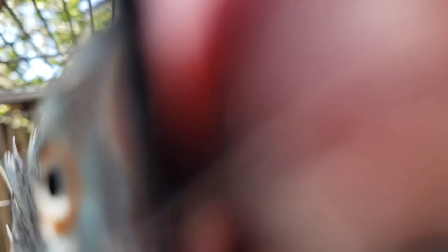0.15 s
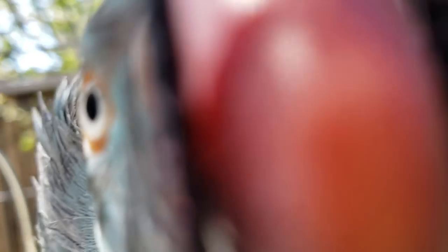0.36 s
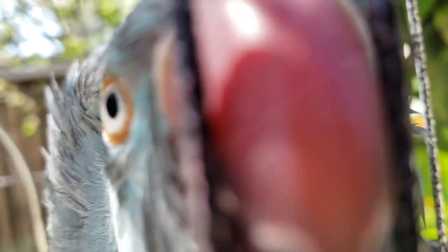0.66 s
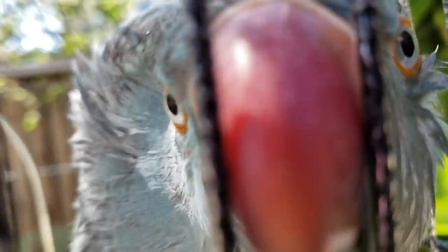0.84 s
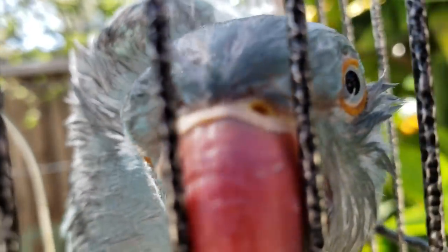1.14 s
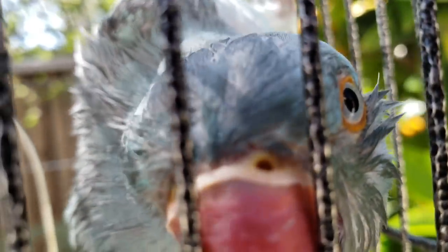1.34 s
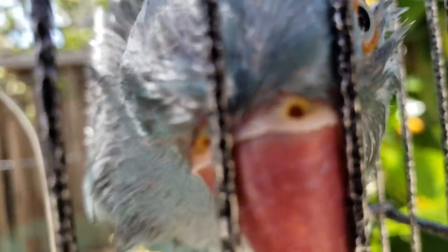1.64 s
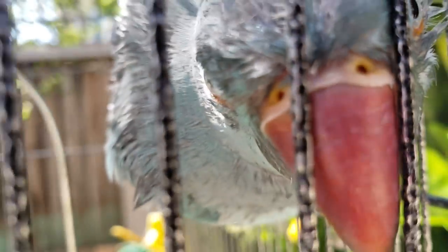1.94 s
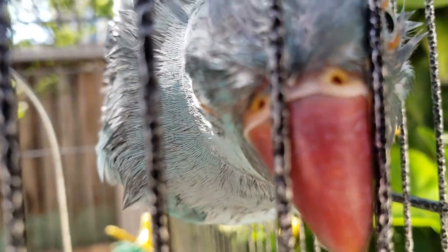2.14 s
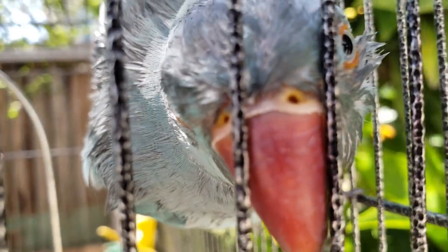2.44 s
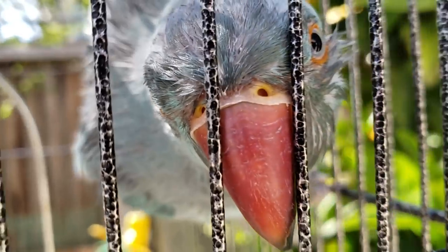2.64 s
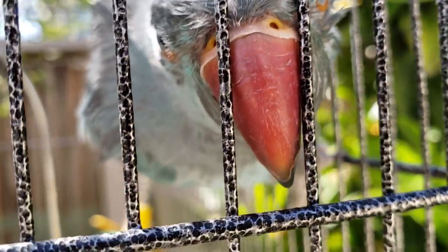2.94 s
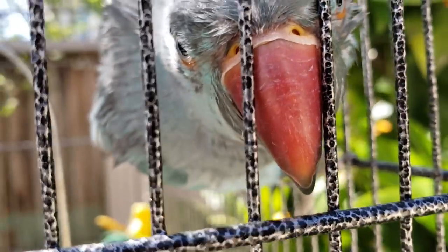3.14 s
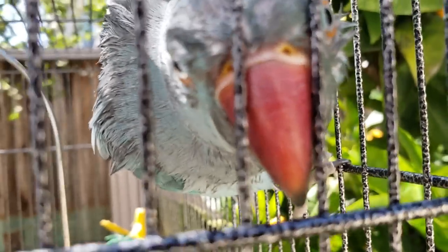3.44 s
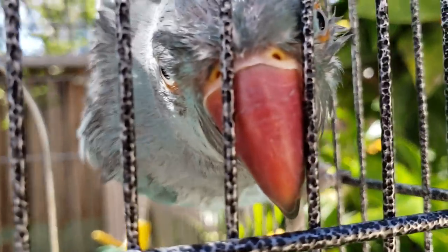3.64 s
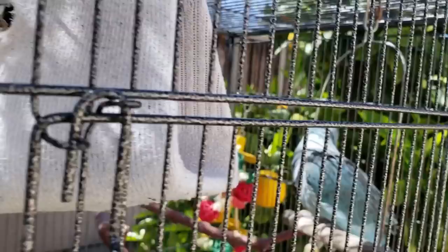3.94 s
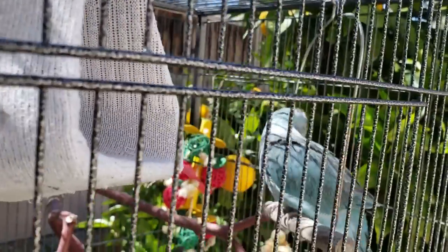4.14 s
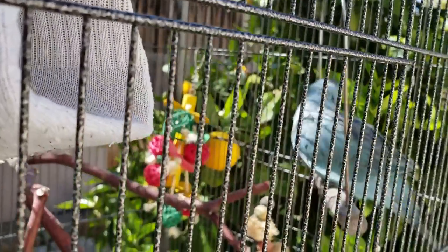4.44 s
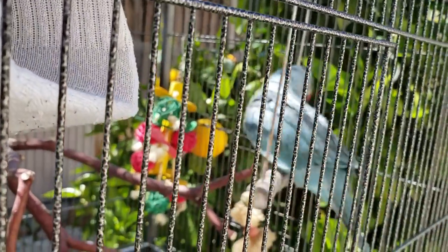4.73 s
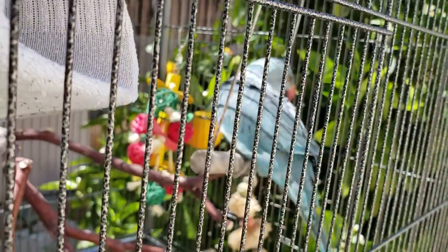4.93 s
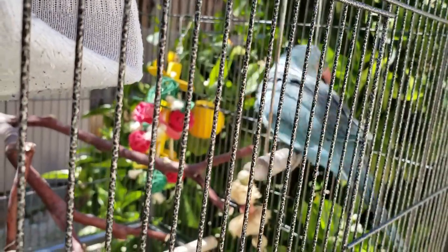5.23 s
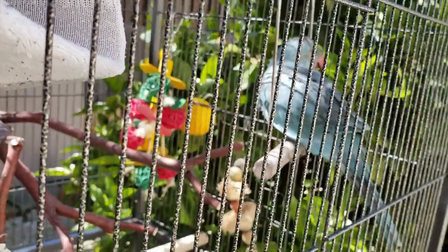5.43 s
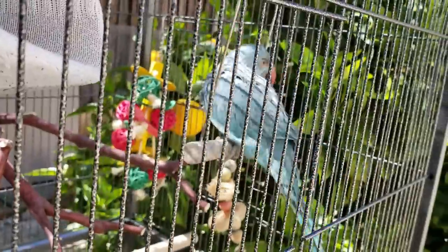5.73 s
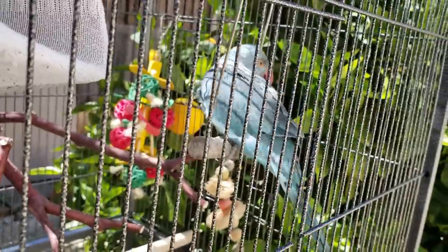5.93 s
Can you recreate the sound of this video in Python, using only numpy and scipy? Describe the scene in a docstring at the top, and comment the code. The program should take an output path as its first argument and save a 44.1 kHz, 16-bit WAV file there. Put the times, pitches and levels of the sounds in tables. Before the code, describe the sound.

From about 0.3 seconds a parrot's beak taps and nibbles directly on the microphone, sharp and very close on the right. The pecks come in quick, uneven clusters, loud between 1 and 1.8 seconds. Behind them small birds chirp faintly in falling notes, over a low rumble of distant traffic and a light hiss of leaves. From 2 seconds the beak only nudges softly, with faint feather rustles and scuffs. The loudest peck lands at about 3.2 seconds, followed by duller knocks and nibbles until 3.9. Then the tapping stops and the quiet garden is heard from a step back, with a cheep just after 4 seconds. Around 5 seconds claws click quickly on the cage wire. A faint, distant low hum swells three times from 5.3 seconds, and a nearby bird gives one more falling cheep at about 5.8 seconds.

```python
"""In a garden, a camera's microphone is held against a parrot's cage. From the start the bird pecks and nibbles
at the right port, squeezing the air in it, while small birds chirp among fences and traffic rumbles far off.
From about 2 s feathers rustle and scuff by the port, and more pecks follow. Just before 4 s the scene changes:
the garden is now heard from a step back from the bars. Around 5 s claws click on the cage wire; then a low hum
swells in the distance and a near bird cheeps once more."""
import sys
import numpy as np
from scipy import signal
from scipy.fft import rfft, irfft, next_fast_len
from scipy.io import wavfile
from scipy.ndimage import uniform_filter1d, map_coordinates

SR = 44100
rng = np.random.default_rng(int(sys.argv[2]) if len(sys.argv) > 2 else 0)


def dump(signal):
    """Clip the signal to [-1, 1] and save it as 16-bit WAV at the path in sys.argv[1]."""
    limited = np.clip(np.atleast_2d(signal).T, -1, 1)
    pcm = np.round(limited * 32767).astype(np.int16)
    wavfile.write(sys.argv[1], SR, pcm)


N = 268083

# hard pecks on the right port: time_s, pressure_db, push_sign (-1 pulls), contact_ms, snap_share, tick_share
PECKS = [(0.2932, -11, -1, 0.67, 3.5, 0.77), (0.3189, -15.5, -1, 0.85, 1.74, .19),
         (0.3612, -11.5, 1, 0.58, 0.3, 0), (0.382, -13.5, -1, 0.37, 2.4, 0.11),
         (0.4886, -29.5, 1, 0.34, .41, .36), (0.588, -17, -1, 0.5, 0.6, 0), (0.6353, -14, -1, 0.38, 0.4, 0),
         (0.663, -8, -1, 0.62, 2.6, 0.000058), (0.9654, 0, -1, 0.32, -0.5, 0.33),
         (0.9826, -8.5, -1, 0.32, 0, 0.06), (1.005, -9, -1, 0.27, -0.5, 0.023),
         (1.1155, -4.5, -1, 0.5, 2.26, 0.00015), (1.45, -5.5, 1, 0.41, -0.5, 0),
         (1.4832, -3, 1, 0.3, 0, .022), (1.529, -7.5, 1, 0.37, 0, 0.036), (1.553, -6, 1, 0.29, 0, 0),
         (1.5615, -31, 1, .2, -1, 0.3), (1.5995, -33, 1, 0.21, 0.5, .5), (1.672, -30.5, 1, 0.24, 1, 0.29),
         (1.5916, -4.5, 1, 0.27, -0.5, 0.055), (1.6237, -6.5, 1, 0.32, 0, 0),
         (1.6645, -4, 1, .33, 0, 0.041), (1.683, -10.5, 1, .37, 0, 0), (1.7354, -5, 1, .34, 0, .063),
         (1.7591, -6, 1, 0.34, 0, 0.078), (3.2154, 4.5, 1, .41, 0, 0.051), (3.2438, -4, 1, 0.37, 0, 0.096),
         (3.4724, -15.5, -1, 0.92, 0.6, 0), (3.4855, -24.5, 1, 0.28, -0.5, 0.13)]
# soft nudges on the same port: time_s, pressure_db, push_sign, contact_ms
NUDGES = [(0.3995, -19, 1, 0.7), (0.573, -20.5, -1, 1), (0.6053, -20.5, 1, 1.05), (1.099, -23, -1, 0.62),
          (1.4967, -19, 1, .54), (1.6029, -25, -1, 1.1), (1.7508, -21, 1, .8), (1.9714, -28.5, 1, 0.71),
          (2.0076, -19, -1, 2.25), (2.0571, -26.5, 1, 0.72), (2.0884, -26, 1, .9), (2.121, -28, -1, 1.23),
          (2.2988, -25.5, 1, 1.03), (2.347, -28.5, 1, 1.2), (2.6522, -19.5, -1, 2.6),
          (3.2509, -17, -1, .91), (3.3498, -20, 1, 0.96), (3.3724, -12.5, -1, 1.9),
          (3.4072, -21.5, -1, 1.65), (3.44, -21, -1, 2.1), (3.4615, -22, 1, 0.81), (3.498, -16, 1, 1.8),
          (3.5188, -10.5, 1, 1.26), (3.542, -23, -1, 2.7), (3.6387, -17, -1, 1.48), (3.724, -23, 1, 1.9),
          (3.8342, -14.5, -1, 1.26), (3.858, -10, -1, 3.6)]
# air pushed at the port while the parrot is close: time_s, level_db
BUFFET = [(0.0, -43.5), (0.37, -71.5), (0.61, -43), (0.82, -56), (1.39, -60), (1.5, -41.5), (1.63, -58.5),
          (2.64, -63), (3.4, -62), (3.94, -46.5)]
NUDGE_TICK_SHARE = 0.034


def parrot_beak():
    """Right on the microphone: the tip clacks and squeezes the air in the port; the case ticks and snaps."""
    air = np.zeros(N)
    t = np.arange(-SR // 50, SR // 25) / SR
    after = np.maximum(t, 0)
    snap_ring = np.exp(-after / 0.00062) * np.sin(2 * np.pi * 430 * after)
    snap_ring *= 1 - np.exp(-(after / 0.00039) ** 2)
    tick_pulse = 1 / np.cosh(t / 0.00011)
    since_touch = np.maximum(t + 0.00121, 0)  # the tip clacks just before the squeeze peaks
    clack_ring = np.sin(2 * np.pi * 1400 * since_touch) + 0.12 * np.sin(2 * np.pi * 2900 * since_touch)
    clack_ring *= (1 - np.exp(-since_touch / 0.000084)) * np.exp(-since_touch / 0.0007)
    nudges = [(*nudge, 0, NUDGE_TICK_SHARE) for nudge in NUDGES]
    for time_s, db, push_sign, contact_ms, snap, tick in PECKS + nudges:
        clack = 0.003 + 0.03 * snap + 0.019 * amp(db) ** 4.66  # grows steeply with pressure
        contact = 1000 * t / contact_ms
        squeeze = 2 / (np.exp(-contact) + np.exp(contact / 1.83))  # quick in, slower out
        peck = squeeze - snap * snap_ring + tick * tick_pulse + clack * clack_ring
        add(air, time_s + t[0], push_sign * amp(db) * peck)
    buffet_db, = curves(BUFFET, outside=-120)
    gusts = amp(buffet_db + 8.5 * wobble(25.05))
    air += gusts * unit(filtered(rng.standard_normal(N), lambda f: resonance(f, 110, 160) ** 2))
    air = filtered(air, lambda f: bass_cut(f, 106.2, damping=0.63))
    covered_port = signal.butter(4, 3900, fs=SR, output="sos")  # shuts out the treble
    return signal.sosfilt(covered_port, air) * amp([[-57], [0]])


# claws and wire, close by: start_s, level_db, left_over_right_db, sizzle_over_ring_db
CLICKS = [(0.8121, -34.5, -7.5, -34), (3.2485, -41.5, -18, -10.5), (3.2898, -42.5, -6.5, -10),
          (3.5568, -38, 1, -16), (4.951, -43, -7, -2), (4.953, -46, -3.5, -6), (4.9647, -31.5, -2.5, -2),
          (4.9749, -45.5, -4, 6.5), (5.0074, -25, -2, -2.5), (5.0227, -30.5, -7.5, -4.5),
          (5.041, -27, 0, -5), (5.0516, -28.5, -3.5, -12.5)]
WIRE_HZ = np.array([[3806.5], [2979]])  # left, right


def cage_clicks():
    """Claws on the cage: a short ring of the wire and a treble sizzle, each with a brief rattling tail."""
    body, treble = np.zeros((2, 2, N))
    t = np.arange(SR // 25) / SR
    for start_s, db, pan_db, sizzle_db in CLICKS:
        ring = decay(t, 0.002) * np.sin(2 * np.pi * WIRE_HZ * t)
        rattle = amp(-16) * decay(t, 0.068) * rng.standard_normal((2, len(t)))
        sizzle = (decay(t, 0.0028) + amp(-17.5) * decay(t, 0.025)) * rng.standard_normal((2, len(t)))
        add(body, start_s, panned(amp(db) * (ring + rattle), pan_db))
        add(treble, start_s, panned(amp(db + sizzle_db) * sizzle, pan_db - 4.5))  # further right
    body = filtered(body, lambda f: resonance(f, 3400, 2900) * bass_cut(f, 1300, damping=0.67))
    treble = filtered(treble, lambda f: bass_cut(f, 7400, damping=1.13) / (1 + (f / 15500) ** 20))
    return body + treble


# feathers beside the right port: time_s, level_db
RUSTLE = [(1.88, -105), (1.98, -72), (2.07, -84), (2.4, -73.5), (2.52, -78.5), (2.73, -70.5), (2.98, -90),
          (3.25, -79.5), (3.42, -100), (3.65, -72), (3.74, -95), (3.83, -71), (3.9, -87), (3.97, -72),
          (4.05, -105)]


def feather_rustle():
    """Feathers at the microphone: tiny crackles on a hiss, ringing in the ports' treble resonance."""
    level_db, = curves(RUSTLE, outside=-120)
    sparks = rng.random((2, N)) < 700 / SR  # about 700 a second
    strength = amp(3 * np.minimum(rng.exponential(size=(2, N)), 3))
    crackle = unit(sparks * strength * rng.standard_normal((2, N)))
    hiss = rng.standard_normal((2, N))
    rustle = filtered(crackle + hiss, lambda f: treble_cut(f) * resonance(f, 11600, 2400) ** 2)
    return panned(amp(level_db) * unit(rustle), -5.5)


# light brushing, close by: start_s, length_s, level_db, left_over_right_db, low_hz, high_hz
SCUFFS = [(1.956, 0.077, -68.5, 0, 2490, 12000), (2.414, 0.021, -68.5, 13, 5550, 12900),
          (3.013, 0.034, -75.5, 9, 8000, 13000), (3.132, 0.047, -71.5, 1, 2000, 4800),
          (3.261, 0.025, -68, -5, 2000, 15600), (3.616, 0.059, -75, 8, 3940, 12240),
          (2.635, 0.092, -67, -2, 2500, 5800), (3.817, 0.012, -66.5, 15, 3500, 12680),
          (3.93, .05, -57.5, 0, 370, 606), (3.932, 0.069, -57, 0.5, 1570, 2220),
          (4.949, 0.15, -66, -1, 1980, 13000), (5.679, 0.0047, -65.5, 10, 6440, 8400)]


def scuffs():
    """Each brushing touch is a burst of uneven hiss in its own band."""
    out = np.zeros((2, N))
    for start_s, length_s, db, pan_db, low_hz, high_hz in SCUFFS:
        count = int(length_s * SR)
        hiss = rng.standard_normal((2, count))
        envelope = amp(2.1 * wobble(300, count)) * np.hanning(count) ** 0.18
        band = signal.butter(6, [low_hz, high_hz], "band", fs=SR, output="sos")
        add(out, start_s, panned(amp(db) * unit(signal.sosfilt(band, hiss * envelope)), pan_db))
    return out


# chirps around the garden: start_s, length_s, first_hz, last_hz, relative_db, left_over_right_db, buzz_hz
CHIRPS = [(0.082, 0.066, 4160, 3380, -72.5, -5.5, 240), (0.096, .12, 3080, 2720, -75, -2, 110),
          (.24, 0.059, 4370, 3540, -68.5, -3.5, 320), (1.771, .044, 3100, 2750, -74, -12, 110),
          (1.79, .093, 4675, 4054, -61, 2, 70), (1.864, 0.028, 4124, 3350, -61.5, -1, 150),
          (2.049, 0.1, 4670, 4010, -66, 2, 480), (1.959, 0.22, 6920, 6550, -69, 13.5, 300),
          (2.646, 0.096, 3077, 2910, -66.5, -1.5, 460), (2.653, .12, 5010, 4600, -65, 1.5, 210),
          (2.781, 0.15, 6400, 5870, -70, 7, 366), (3.387, 0.16, 1883, 1826, -68, -10, 78),
          (3.416, 0.11, 4740, 4737, -64, 0, 212), (3.661, .14, 5310, 2900, -61, 3, 120),
          (5.584, 0.06, 3270, 3010, -63.5, 1, 340)]
# a far bird's two songs, to the left: offset_s, length_s, first_hz, last_hz, relative_db, left_over_right_db
SHORT_SONG = [(0, .125, 8550, 8050, -77, 17.5), (.15, 0.12, 6170, 5570, -68, 6),
              (.257, 0.16, 7500, 6440, -70, 11.5)]
LONG_SONG = [(0, .18, 8640, 7130, -66, 19.4), (.21, .215, 7310, 6860, -70, 14.5),
             (.35, .12, 7970, 7270, -73.5, 15)]
# each time it sings them: start_s, gain_db, stretch_ratio
SHORT_REPEATS = [(-.155, -0.5, 1.01), (.781, 1.5, 0.96), (1.62, 1, 0.92)]
LONG_REPEATS = [(2.502, 1, 1.12), (3.273, -3, .88)]
# a near bird's two-voiced cheeps: start_s, length_s, first_hz, last_hz, relative_db, bend_power, buzz_hz
CHEEPS = [(0.677, .128, 5000, 3330, -57.5, 3.06, 76), (4.148, .13, 4935, 3400, -57.5, 1.6, 94.5),
          (5.775, .145, 5390, 3447, -54, 2.1, 104)]


def garden_birds():
    """Falling whistles; the buzzier ones are far off and reach the microphone mostly as garden echoes."""
    direct, echoed = np.zeros((2, 2, N))

    def sing(start_s, length_s, first_hz, last_hz, db, pan_db, buzz_hz, bend):
        """One note, shared between the direct path and the echoes."""
        nearness = np.exp(-buzz_hz / 170)
        call = panned(amp(db) * whistle(length_s, first_hz, last_hz, buzz_hz, bend, nearness), pan_db)
        add(direct, start_s, nearness * call)
        add(echoed, start_s, (1 - 0.5 * nearness) * call)

    for chirp in CHIRPS:
        sing(*chirp, bend=0.78)
    for song, repeats in [(SHORT_SONG, SHORT_REPEATS), (LONG_SONG, LONG_REPEATS)]:
        for start_s, gain_db, stretch in repeats:
            for offset_s, length_s, first_hz, last_hz, db, pan_db in song:
                sing(start_s + stretch * offset_s, stretch * length_s, first_hz, last_hz,
                     db + gain_db, pan_db, buzz_hz=303, bend=1.05)
    for start_s, length_s, first_hz, last_hz, db, bend, buzz_hz in CHEEPS:
        for delay_s, ratio, gain_db in [(0, 1, 0), (0.008, 1.13, 1.7)]:  # lower voice, upper voice
            sing(start_s + delay_s, length_s, ratio * first_hz, ratio * last_hz,
                 db + gain_db, pan_db=1, buzz_hz=buzz_hz, bend=bend)
    return 2.64 * direct + 1.4 * fence_echoes(echoed)


def whistle(length_s, first_hz, last_hz, buzz_hz, bend, nearness):
    """A falling tone roughened by pitch jitter; a higher bend drops sooner and lingers on the last pitch."""
    progress = np.linspace(0, 1, int(length_s * SR))
    hz = last_hz + (first_hz - last_hz) * (1 - progress) ** bend
    hz += buzz_hz * wobble(500, len(hz))
    linger = nearness * np.clip(bend - 0.6, 0, 1)
    swell = np.sin(np.pi * progress ** (1 + 1.2 * linger)) ** 0.4
    throat = abs(resonance(hz, 4000, 2200)) ** linger  # lingering calls bloom at the throat resonance
    flutter_db = 2.5 * wobble(90, len(hz))
    accent_db = 4.5 * np.clip(bend - 1, 0, 1) * np.exp(-((progress - 0.8) / 0.16) ** 2)
    phase = 2 * np.pi * np.cumsum(hz) / SR + rng.uniform(0, 2 * np.pi, (2, 1))  # a path to each port
    return swell * throat * amp(flutter_db + accent_db) * np.sin(phase)


def fence_echoes(calls):
    """The garden scatters the calls back in a quick wash with a fainter, longer tail."""
    t = np.arange(SR) / SR
    envelope = (decay(t, 0.4) + 0.22 * decay(t, 1.3)) * (1 - np.exp(-t / 0.00097))
    tail = rng.standard_normal((2, SR)) * envelope
    return signal.fftconvolve(calls, tail / np.linalg.norm(tail[0]), axes=1)[:, :N]


# far traffic and leaves: time_s, level_db, leaf_boost_db
GARDEN_LEVELS = [(0.0, -66.5, 3.5), (1.15, -61.5, -5), (1.76, -62, 0), (3.15, -63, 2.5), (3.33, -62, 7.5),
                 (3.86, -67, 12.5), (4.01, -70.5, 1), (4.25, -71.5, 0.1), (6.08, -68.5, -1)]
# their spectrum at the bars, and a step back: frequency_hz, relative_density_db
COLOUR_AT_BARS = [(15, -48.5), (25, -1), (90, 2.5), (263, -10), (316, -14.5), (812, -15.5), (1000, -11.5),
                  (1830, -22.5), (2140, -29.5), (3080, -34), (5480, -38), (6940, -38), (9010, -43),
                  (11400, -40), (13000, -47.5)]
COLOUR_STEP_BACK = [(15, -56.5), (25, -18), (43, -4), (144, 2), (164, -9.5), (250, -9.5), (293, -16),
                    (411, -22), (609, -24.5), (1270, -26.5), (1730, -32), (2630, -25), (5070, -30.5),
                    (5930, -32), (13000, -44)]
# humming bands heard a step back: centre_hz, width_hz, boost_db
HUMMING_BANDS = [(1275, 186, 11.5), (2710, 160, 7), (4720, 870, 7.5)]
# how alike the two ports hear the garden: frequency_hz, correlation
PORT_LIKENESS = [(60, 0.88), (180, 0.99), (550, 0.46), (1650, -0.48), (4970, 0.35), (15000, -0.18)]
STEP_BACK_S, CROSSFADE_S, LEAVES_ABOVE_HZ = 3.94, 0.024, 2000


def traffic_and_leaves():
    """Distant rumble and leaf hiss, changing colour when the scene changes from the bars to a step back."""
    def step_back_db(f):
        bands_db = sum(db * abs(resonance(f, hz, width)) ** 2 for hz, width, db in HUMMING_BANDS)
        return along(COLOUR_STEP_BACK, f) + bands_db

    level_db, leaf_boost_db = curves(GARDEN_LEVELS)
    at_bars = outdoor_rush(lambda f: along(COLOUR_AT_BARS, f), patchy_db=0.7)
    step_back = outdoor_rush(step_back_db, patchy_db=-1.97)
    fade = np.pi / 2 * np.clip((np.arange(N) / SR - STEP_BACK_S) / CROSSFADE_S, 0, 1)
    air = np.cos(fade) * at_bars + np.sin(fade) * step_back
    leaves = filtered(air, lambda f: 1 / (1 + (LEAVES_ABOVE_HZ / (f + 1)) ** 6))
    return amp(level_db) * (air + (amp(leaf_boost_db) - 1) * leaves)


def outdoor_rush(colour_db, patchy_db):
    """Noise at both ports with patches of random gain, rms 1 between 600 and 2000 Hz."""
    def mid_side_response(f):
        spread = np.arccos(np.clip(along(PORT_LIKENESS, f), -1, 1)) / 2
        return treble_cut(f) * amp(colour_db(f)) * [np.cos(spread), np.sin(spread)]

    spectra = signal.stft(rng.standard_normal((2, N + 512)), nperseg=512)[2]
    patches = uniform_filter1d(rng.standard_normal(spectra.shape[1:]), 6, axis=0)
    patches = uniform_filter1d(patches, 12, axis=1)
    noise = signal.istft(spectra * amp(patchy_db * unit(patches)), nperseg=512)[1][:, :N]
    mid, side = filtered(noise, mid_side_response)
    stereo = np.array([mid + side, mid - side])
    return stereo / filtered(stereo, lambda f: (f > 600) & (f < 2000)).std()


# swells of a low hum, far off: start_s, length_s, pitch_hz, level_db
HUMS = [(5.31, .1, 134.5, -58), (5.46, 0.14, 135.8, -53.5), (5.69, 0.3, 146.6, -52)]


def distant_hum():
    """A low tone swells and fades, alike at both ports."""
    out = np.zeros(N)
    for start_s, length_s, pitch_hz, db in HUMS:
        t = np.arange(int(length_s * SR)) / SR
        swell = np.sin(np.pi * t / length_s) ** 0.72
        add(out, start_s, np.sqrt(2) * amp(db) * swell * np.sin(2 * np.pi * pitch_hz * t))
    return out


def amp(db):
    return 10 ** (np.asarray(db) / 20)


def decay(t, t60_s):
    return amp(-60 * t / t60_s)


def unit(x):
    return x / np.sqrt(np.mean(x ** 2) + 1e-20)


def panned(x, left_over_right_db):
    return x * amp([[left_over_right_db / 2], [-left_over_right_db / 2]])


def add(out, start_s, sound):
    """Mix a sound in, trimmed to fit."""
    first = round(start_s * SR)
    sound = sound[..., max(-first, 0):]
    part = out[..., max(first, 0):][..., :sound.shape[-1]]
    part += sound[..., :part.shape[-1]]


def along(points, hz):
    """Interpolate (frequency_hz, value) points on a log axis."""
    f, values = np.transpose(points)
    return np.interp(np.log(hz + 1), np.log(f + 1), values)


def curves(rows, outside=None):
    """One value per sample for each column after the time."""
    times, *columns = np.transpose(rows)
    return [np.interp(np.arange(N) / SR, times, column, outside, outside) for column in columns]


def wobble(rate, count=N):
    """A smooth random curve, rate knots a second."""
    knots = rng.standard_normal(int(count * rate / SR) + 4)
    return map_coordinates(knots, [np.arange(count) * rate / SR])


def filtered(x, response):
    """x through a complex frequency response."""
    size = next_fast_len(N + SR // 2)
    return irfft(rfft(x, size) * response(np.fft.rfftfreq(size, 1 / SR)), size)[..., :N]


def resonance(f, hz, width_hz):
    """A causal resonance of gain 1."""
    return 1j * f * width_hz / (hz * hz - f * f + 1j * f * width_hz + 1e-9)


def bass_cut(f, corner_hz, damping):
    """A causal third-order high-pass that swings after a pulse."""
    s = 1j * f / corner_hz
    return s ** 3 / ((s + 1) * (s * s + damping * s + 1))


def treble_cut(f):
    """A steep roll-off of the top treble."""
    return 1 / (1 + (f / 12900) ** 30)


def scene():
    """Parrot, cage and garden as they reach the two ports."""
    return (parrot_beak() + garden_birds() + cage_clicks() + scuffs() + feather_rustle()
            + traffic_and_leaves() + distant_hum())


def record(dry):
    """The camera rounds off full-scale swings and passes nothing above 16.6 kHz."""
    rounded = dry / (1 + abs(dry / 1.1) ** 6) ** (1 / 6)
    return filtered(rounded, lambda f: f < 16600)


dry = scene()
out = record(dry)
dump(out)
```